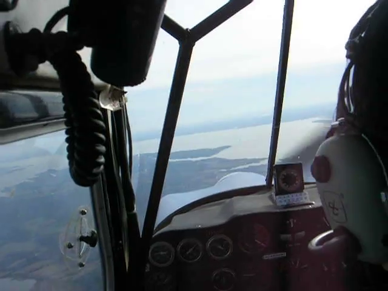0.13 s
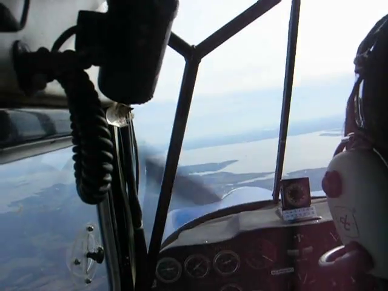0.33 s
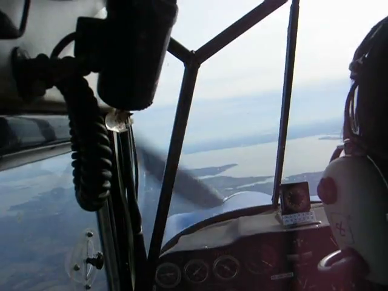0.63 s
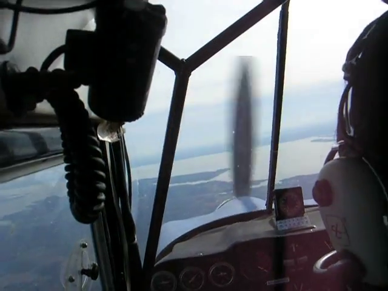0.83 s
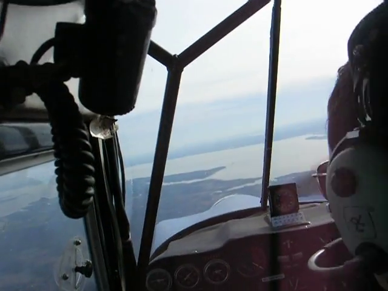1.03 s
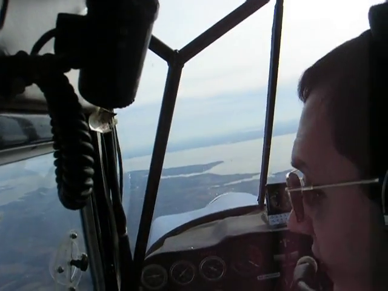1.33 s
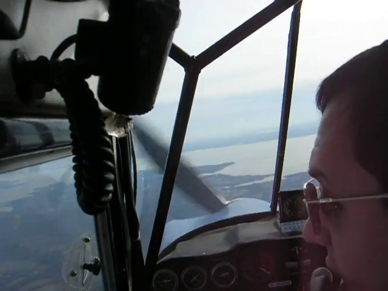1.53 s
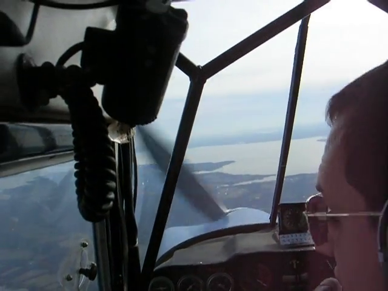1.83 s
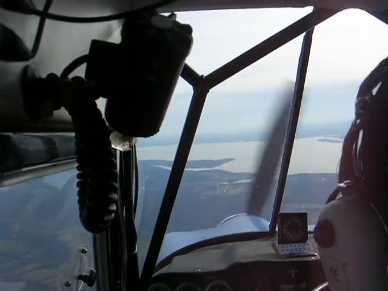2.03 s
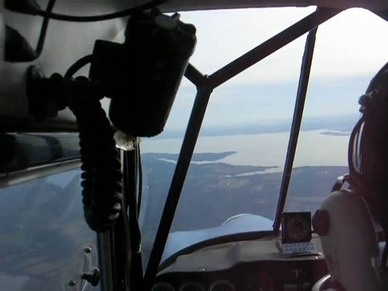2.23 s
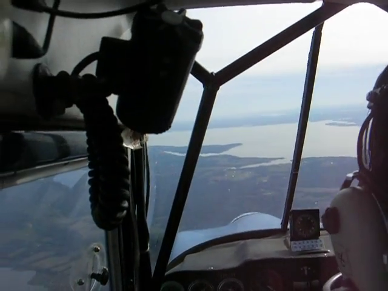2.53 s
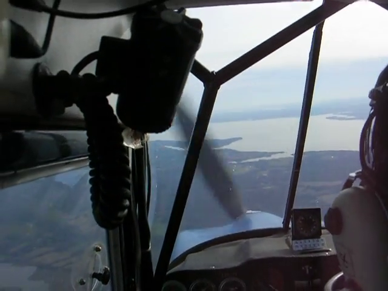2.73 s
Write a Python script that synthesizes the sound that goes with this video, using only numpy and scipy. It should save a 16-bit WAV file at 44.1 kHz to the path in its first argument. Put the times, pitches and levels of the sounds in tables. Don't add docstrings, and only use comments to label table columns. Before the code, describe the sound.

Steady loud propeller engine drone inside a light aircraft cabin, with rushing wind roar and hiss

```python
import sys
import numpy as np
from scipy import signal
from scipy.fft import rfft, irfft
from scipy.io import wavfile
from scipy.ndimage import uniform_filter1d

SR = 44100
rng = np.random.default_rng(int(sys.argv[2]) if len(sys.argv) > 2 else 0)


def invert_db(x):
    u = np.asarray(x, float) / 20
    return 10 ** u


def bounce(signal):
    frames = np.transpose(np.atleast_2d(signal))
    limited = np.clip(frames, -1, 1)
    pcm = np.round(limited * 32767).astype(np.int16)
    wavfile.write(sys.argv[1], SR, pcm)


N = 126567
FIRING_HZ = 86.73
BOOM_TOP_HZ = 600


def rms_one(x):
    return x / np.sqrt(np.mean(x ** 2) + 1e-20)


def in_time(rows):
    return np.interp(np.arange(N) / SR, *np.transpose(rows))


def drift(rate_hz):
    hop, settle = 40, 2000
    r = np.exp(-2 * np.pi * rate_hz * hop / SR)
    noise = rng.standard_normal(N // hop + settle + 2)
    slow = signal.lfilter([1], [1, -2 * r, r * r], noise)[settle:]
    slow = rms_one(slow - slow.mean())
    return np.interp(np.arange(N) / hop, np.arange(len(slow)), slow)


def turbulence(spectrum, shared_db, flicker_db, boom_db):
    hz = np.maximum(np.arange(N // 2 + 1) * SR / N, 1)
    points_hz, points_db = np.transpose(spectrum)
    bottom, top = points_hz[0], points_hz[-1]
    shape = invert_db(np.interp(np.log(hz), np.log(points_hz), points_db))
    shape = shape * np.minimum(1, (hz / bottom) ** 4) * np.minimum(1, (top / hz) ** 4)
    noise = rfft(rng.standard_normal(N)) * shape
    out = 0
    for octave in np.arange(np.log2(bottom) - 1, np.log2(top) + 1, 1 / 3):
        triangle = np.clip(1 - 3 * abs(np.log2(hz) - octave), 0, 1)
        band = irfft(noise * triangle, N)
        boom_share = 1 / (1 + (2 ** octave / BOOM_TOP_HZ) ** 4)
        out = out + band * invert_db(shared_db + flicker_db * drift(20.0) + boom_share * boom_db)
    return rms_one(out)


def slipstream_strength():
    # (time [s], level [dB])
    gust_rows = [(0.05, -16), (0.07, -21.5), (1.0, -21.5), (1.09, -19), (1.29, -24), (1.29, -21),
                 (1.49, -22.5), (1.79, -20), (1.8, -20.5), (2.19, -21.5), (2.24, -20.5), (2.27, -21),
                 (2.36, -21), (2.53, -22.5), (2.69, -20.5), (2.86, -21)]
    return in_time(gust_rows)


def cabin_boom():
    # (time [s], level [dB])
    boom_rows = [
        (0.05, -15),
        (0.92, -14.5),
        (0.96, -13.5),
        (1.25, -15.5),
        (1.27, -14.5),
        (1.76, -17),
        (2.58, -18),
        (2.86, -17.5),
    ]
    return in_time(boom_rows)


def skin_roar(gust_db, buffet_db, boom_db):
    # (frequency [Hz], density [dB per Hz])
    skin_spectrum = [(18, -35), (30, -22.5), (43, -33.5), (81, -11), (123, -11.5), (170, -1.5), (220, -0.5),
                     (937, 1.5), (1400, -11.5), (1820, -55.5), (3080, -120)]
    shared_db = 0.6 * gust_db + 1.8 * buffet_db
    return invert_db(-16) * turbulence(skin_spectrum, shared_db, 1.0, 0.46 * boom_db)


def door_hiss(level_db, gust_db, buffet_db):
    # (frequency [Hz], density [dB per Hz])
    gap_spectrum = [(600, -34), (1100, -12), (1570, -8.5), (2450, -8), (3000, -9.5), (3500, -11.5),
                    (3900, -28), (4200, -38.5), (4500, -64.5), (5700, -100)]
    return invert_db(level_db) * turbulence(gap_spectrum, gust_db + buffet_db, 0.55, 0)


def panels(strength_db, boom_db):
    # (frequency [Hz], width [Hz], level [dB])
    panel_modes = [(358.7, 88, -27), (702, 78, -33.5), (812.7, 90, -27.5), (914, 100, -27.5),
                   (1685, 140, -36.5), (2944, 420, -34.5)]
    out = 0
    for hz, width, db in panel_modes:
        r = np.exp(-np.pi * width / SR)
        b = [1, 0.0059, -1.016]
        a = [1, -2 * r * np.cos(2 * np.pi * hz / SR), r * r]
        once = signal.lfilter(b, a, rng.standard_normal(N))
        ring = rms_one(signal.lfilter(b, a, once))
        out = out + invert_db(db + strength_db + boom_db * (hz < BOOM_TOP_HZ)) * ring
    return out


def engine(boom_db, turn):
    # (multiple of firing rate [1], level [dB rms], share of boom swing [1])
    harmonics = [(1, -28.5, .05), (2, -24.5, 0.76), (3, -30.5, 0.79), (4, -25.5, 2.1), (5, -26.5, 2.3),
                 (6, -34, 1.4), (7, -40, .4), (8, -26, .3), (9, -36.5, .2), (10, -42, .2),
                 (11, -31.5, 0.17), (12, -40, .2), (18, -47.5, .1)]
    # (multiple of the four-firing cycle rate [1], level [dB rms])
    uneven = [(5, -48), (6, -43), (7, -43), (10, -39), (14, -37), (18, -33), (22, -35), (26, -38),
              (30, -37), (33, -36), (42, -36), (45, -35)]
    wander_hz = 3.0
    out = 0
    for k, db, share in harmonics:
        wander_db = 0.88 * np.sqrt(k - .9) * drift(wander_hz)
        tone = np.sin(round(k) * turn + rng.uniform(0, 2 * np.pi))
        out = out + invert_db(db + share * boom_db + wander_db) * tone
    for k, db in uneven:
        wander_db = 3.5 * drift(wander_hz)
        tone = np.sin(round(k) * turn / 4 + rng.uniform(0, 2 * np.pi))
        out = out + invert_db(db + wander_db) * tone
    return np.sqrt(2) * out


def scene():
    boom, gust = cabin_boom(), slipstream_strength()
    boom_db, gust_db = boom - boom.mean(), gust - gust.mean()
    sway = 0.052 * drift(2.5)
    turn = 2 * np.pi * FIRING_HZ * np.arange(N) / SR + sway
    buffet_db = 0.35 * drift(6.0) + 0.5 * drift(20.0)
    roar = skin_roar(gust_db, buffet_db, boom_db)
    hiss = door_hiss(gust.mean() - 5.5, gust_db, buffet_db)
    rattle = panels(0.27 * gust_db + buffet_db, 1.3 * boom_db)
    blade_throb = 1 + 0.033 * np.sin(turn)
    wash = (roar + hiss + rattle) * blade_throb
    return (engine(boom_db, turn) + wash)[None]


def microphone(x):
    ceiling, knee = .76, 5
    x = x / (1 + np.abs(x / ceiling) ** knee) ** (1 / knee)
    swing = uniform_filter1d(np.abs(np.diff(x, prepend=0)), int(0.0022 * SR))
    grit = rms_one(swing) * rng.standard_normal(N)
    grit = signal.sosfilt(signal.butter(4, 3900, fs=SR, output="sos"), grit)
    x = x + invert_db(-30) * rms_one(grit)
    x = signal.sosfilt(signal.butter(4, 74, "high", fs=SR, output="sos"), x)
    return signal.sosfilt(signal.cheby2(14, 70, 4763, fs=SR, output="sos"), x)


def cut_in(x):
    start_s, pop_s, fade_s = .03626, .0002, .0015
    pop_level, offset = .45, -.055
    x = x * np.clip(np.arange(N)[::-1] / SR / fade_s, 0, 1)
    since = np.arange(N) / SR - start_s
    pop = np.exp(-(since / pop_s) ** 2)
    return (x * (1 - pop) + pop_level * pop + offset) * (since >= 0)


def low_pass(x):
    return signal.sosfilt(signal.butter(12, 19000, fs=SR, output="sos"), x)


def record(dry):
    x = cut_in(microphone(dry))
    x = signal.sosfilt(signal.cheby2(12, 60, 17000, fs=SR, output="sos"), x)
    return low_pass(x)


dry = scene()
out = record(dry)
bounce(out)
```